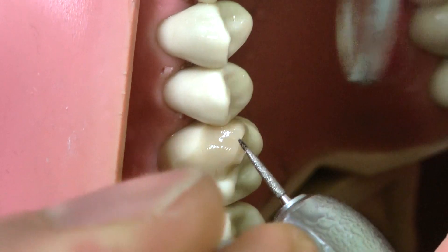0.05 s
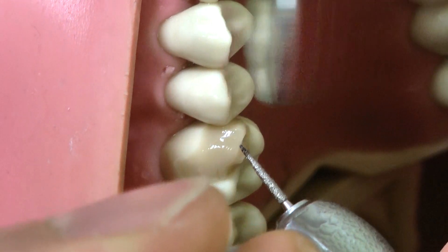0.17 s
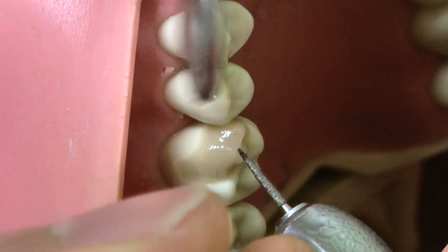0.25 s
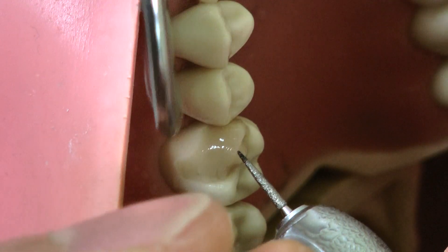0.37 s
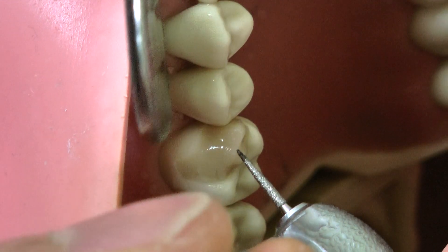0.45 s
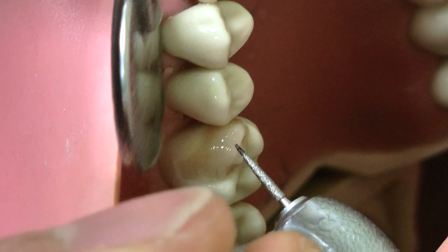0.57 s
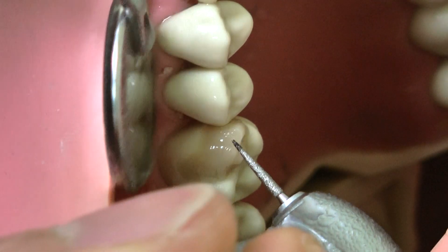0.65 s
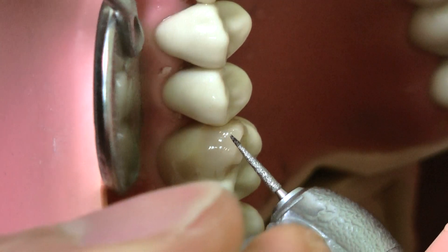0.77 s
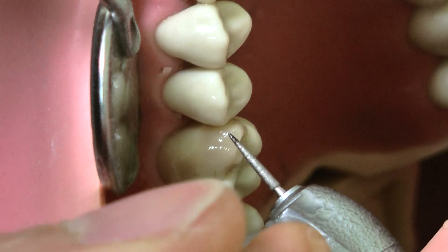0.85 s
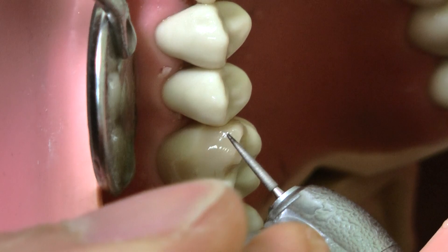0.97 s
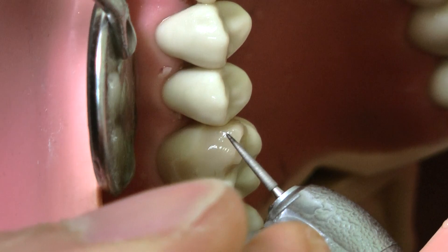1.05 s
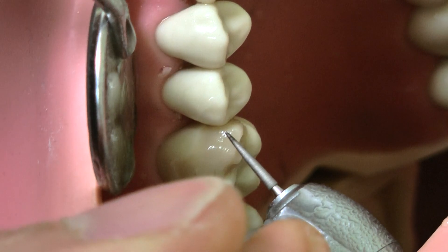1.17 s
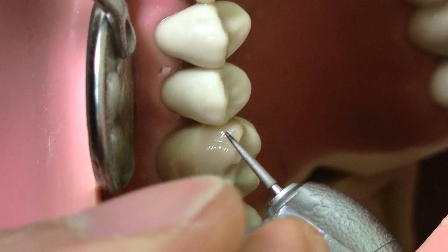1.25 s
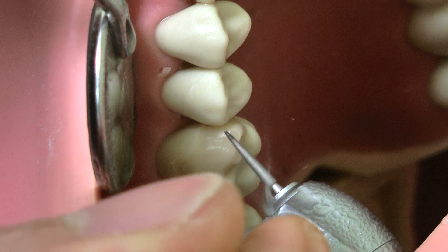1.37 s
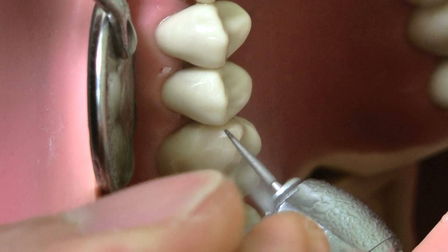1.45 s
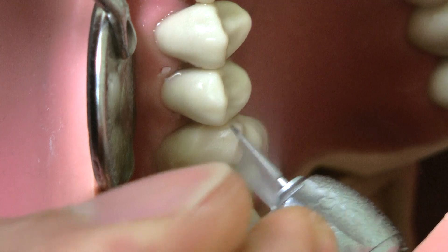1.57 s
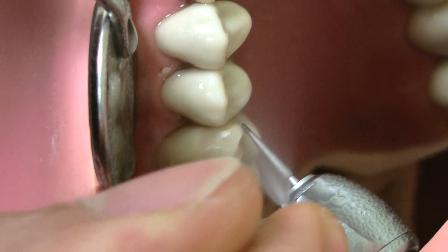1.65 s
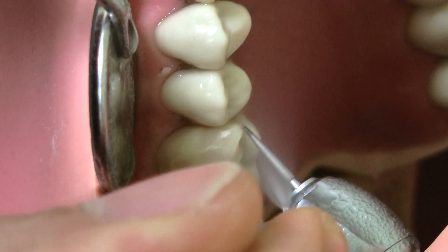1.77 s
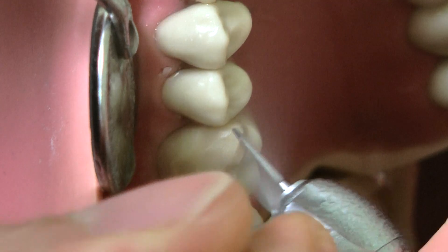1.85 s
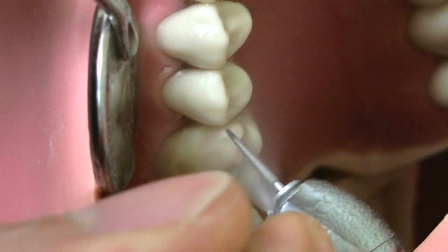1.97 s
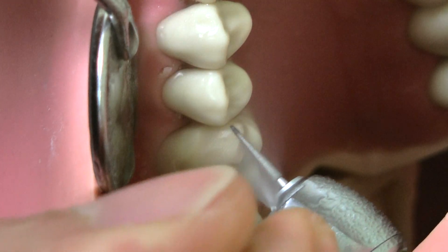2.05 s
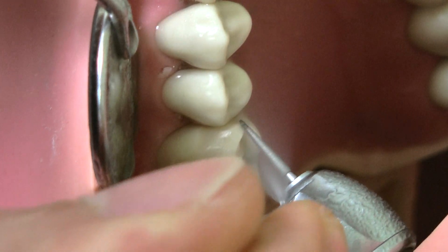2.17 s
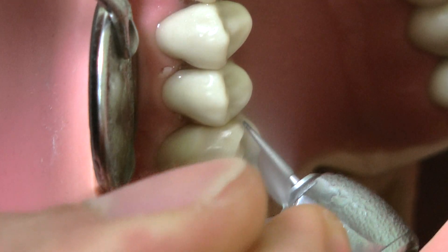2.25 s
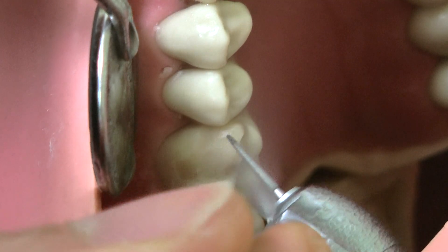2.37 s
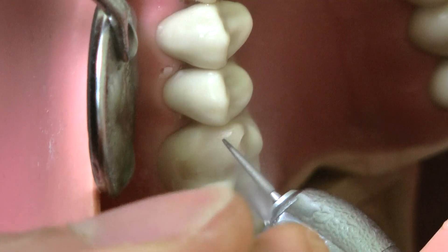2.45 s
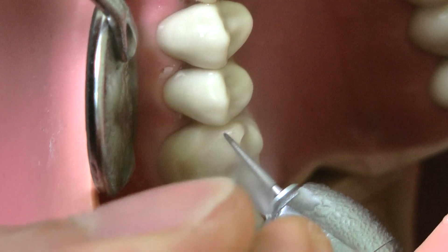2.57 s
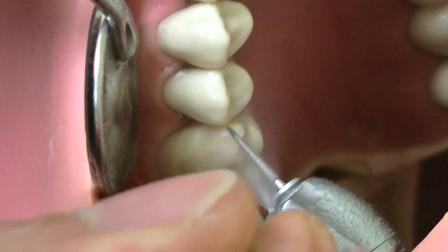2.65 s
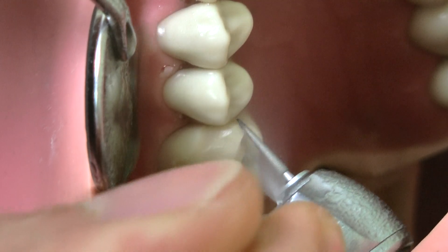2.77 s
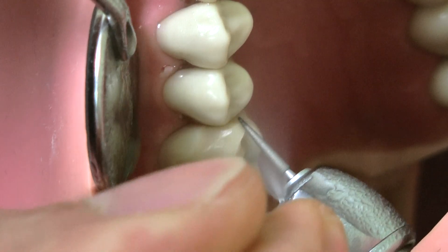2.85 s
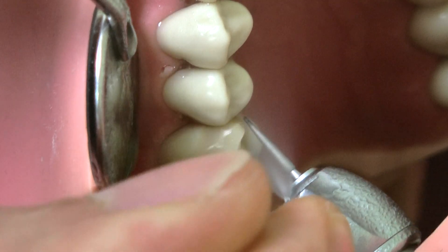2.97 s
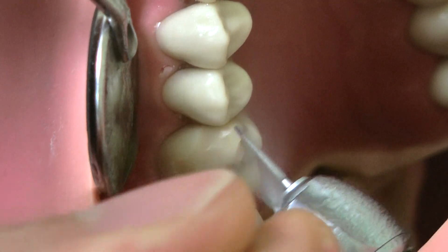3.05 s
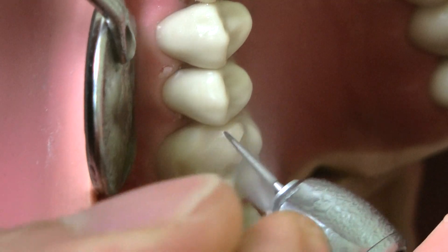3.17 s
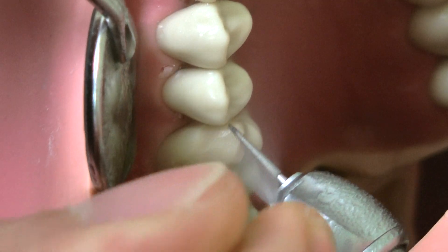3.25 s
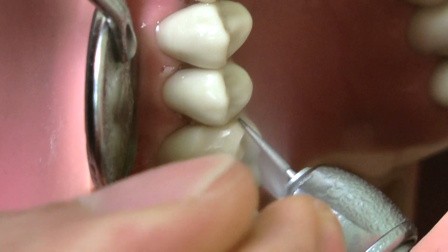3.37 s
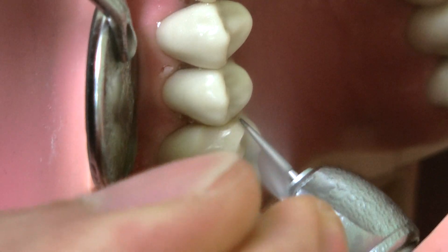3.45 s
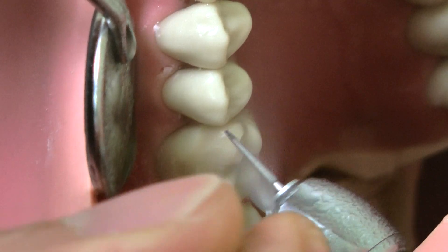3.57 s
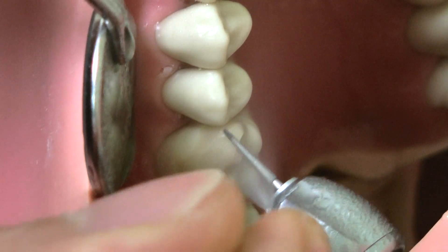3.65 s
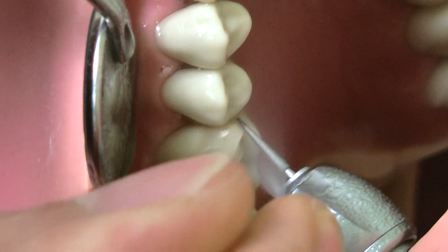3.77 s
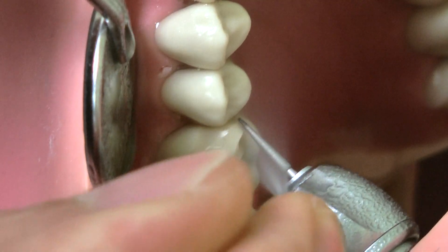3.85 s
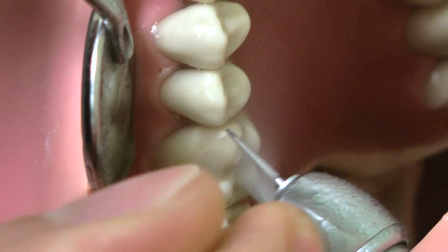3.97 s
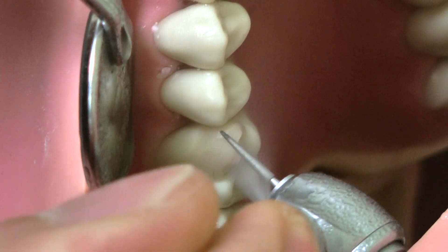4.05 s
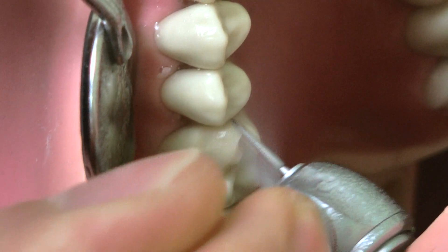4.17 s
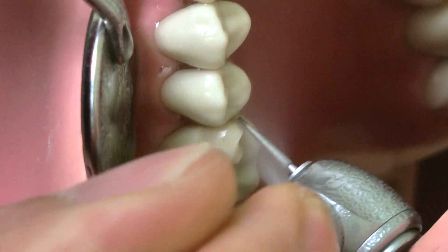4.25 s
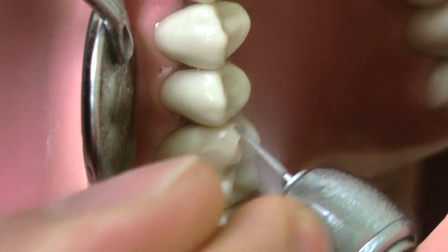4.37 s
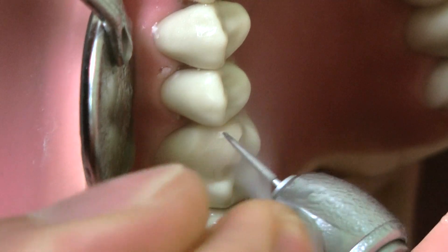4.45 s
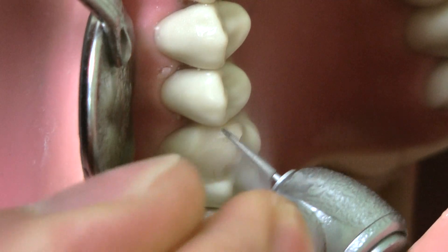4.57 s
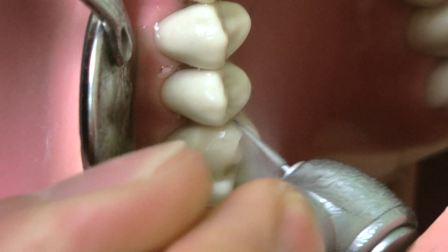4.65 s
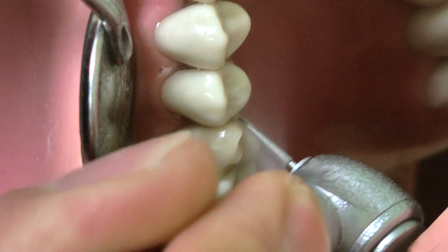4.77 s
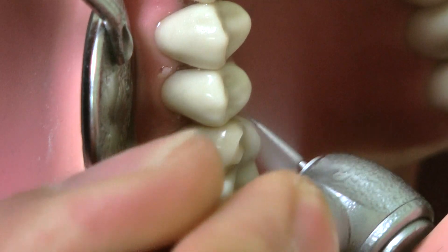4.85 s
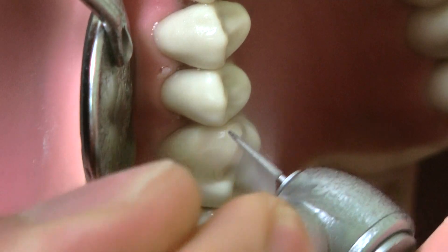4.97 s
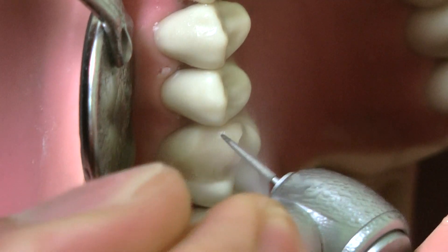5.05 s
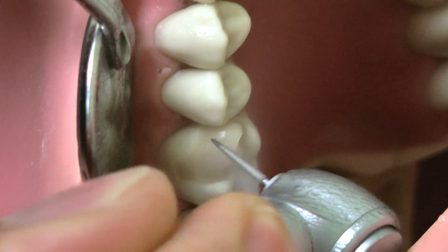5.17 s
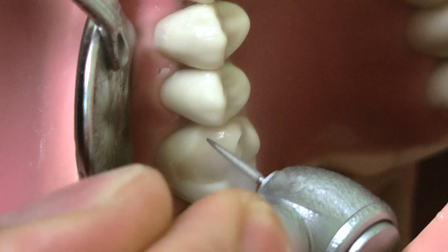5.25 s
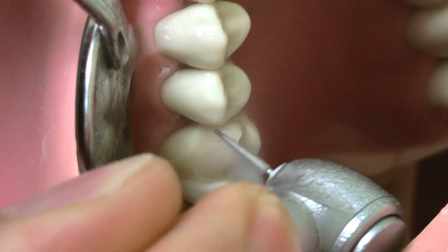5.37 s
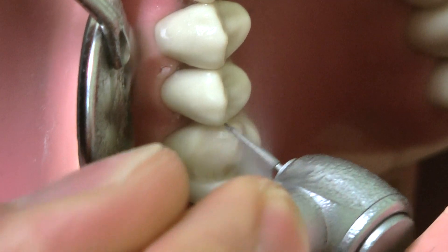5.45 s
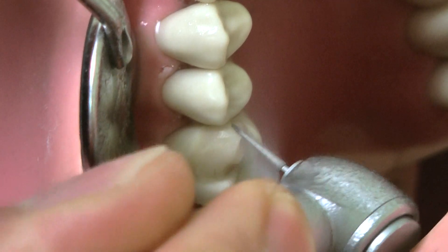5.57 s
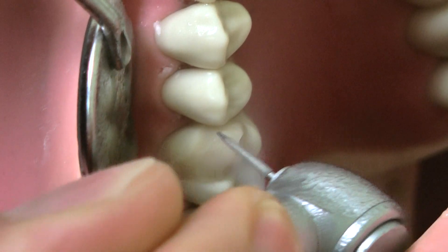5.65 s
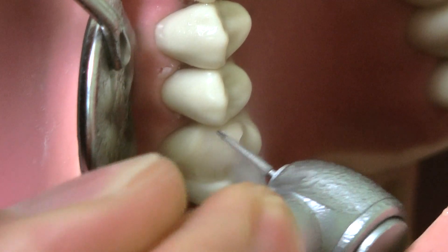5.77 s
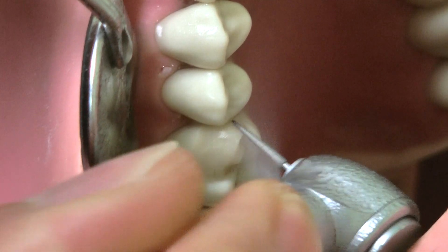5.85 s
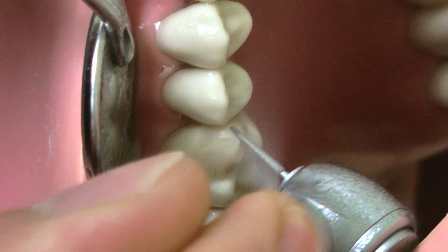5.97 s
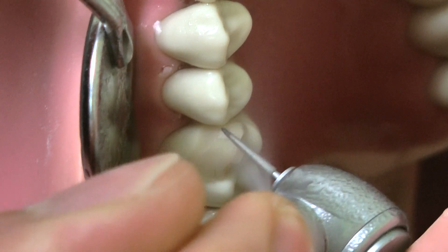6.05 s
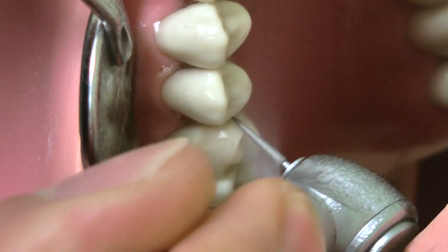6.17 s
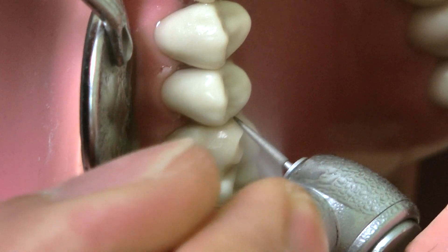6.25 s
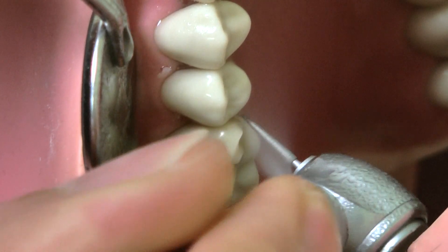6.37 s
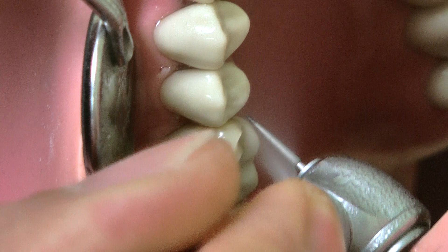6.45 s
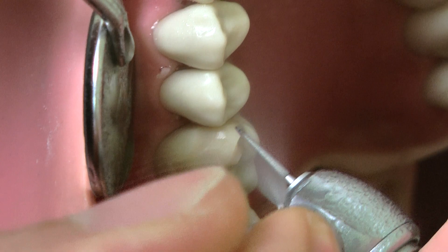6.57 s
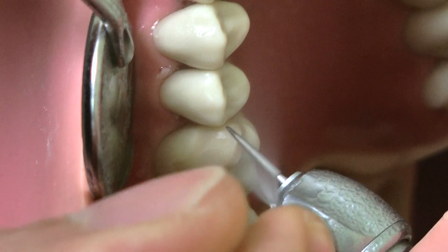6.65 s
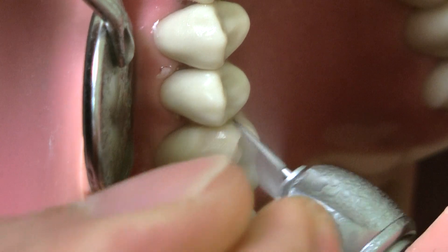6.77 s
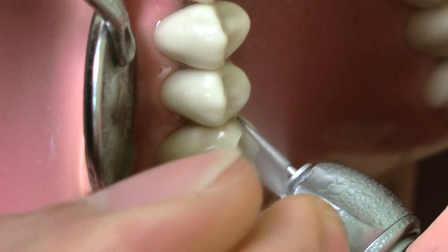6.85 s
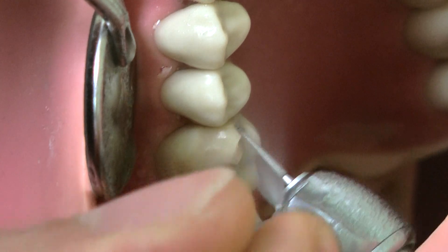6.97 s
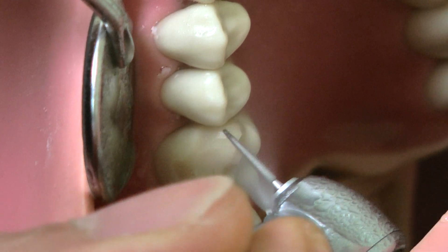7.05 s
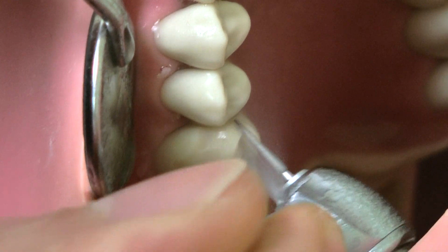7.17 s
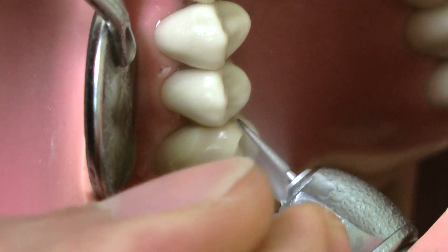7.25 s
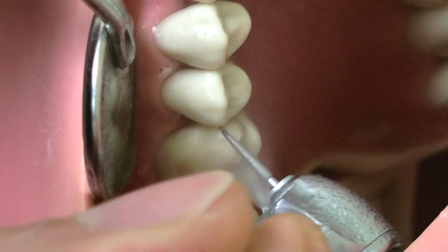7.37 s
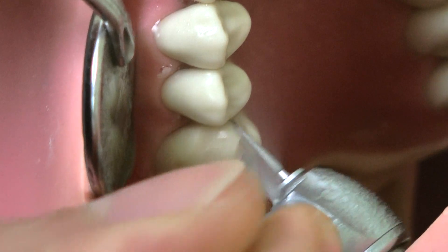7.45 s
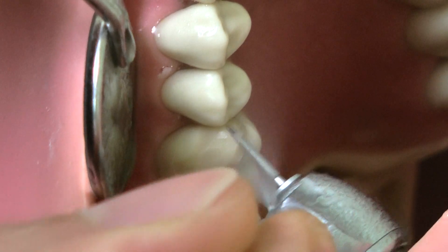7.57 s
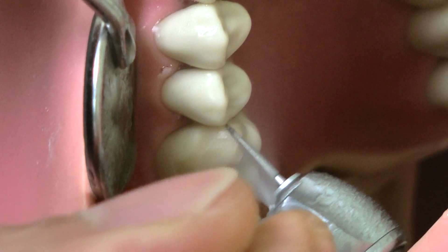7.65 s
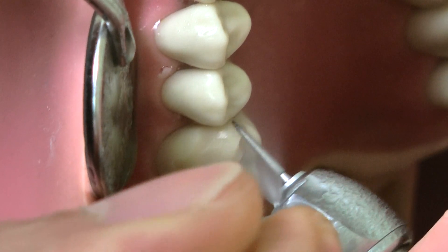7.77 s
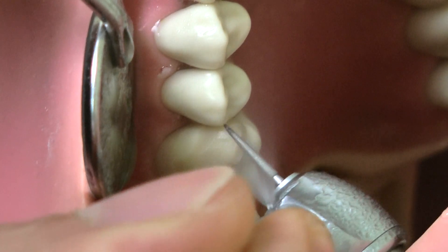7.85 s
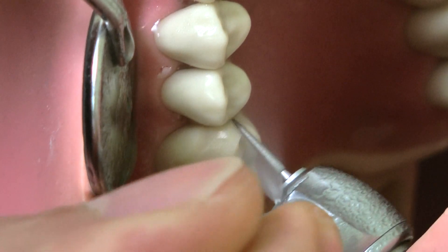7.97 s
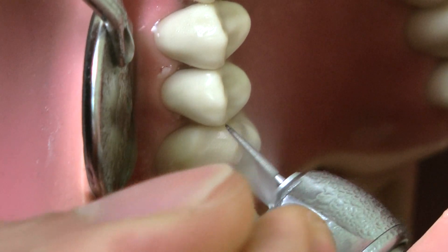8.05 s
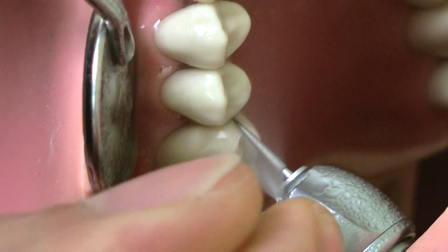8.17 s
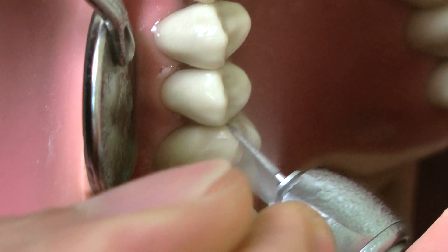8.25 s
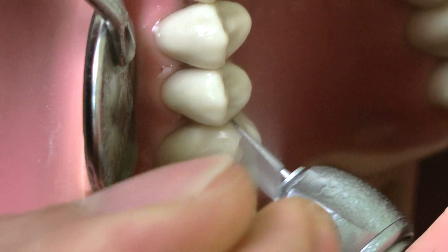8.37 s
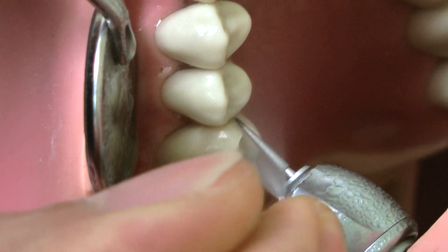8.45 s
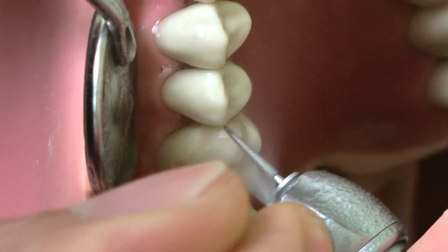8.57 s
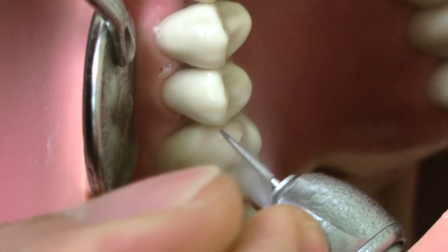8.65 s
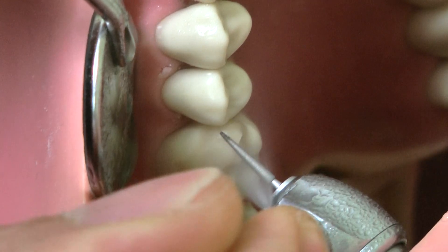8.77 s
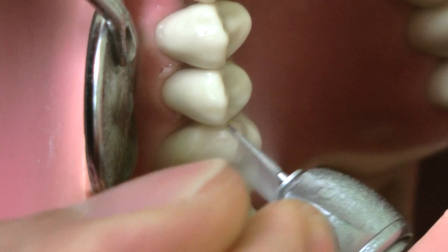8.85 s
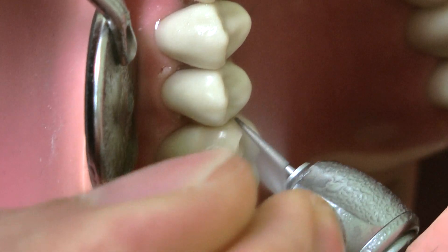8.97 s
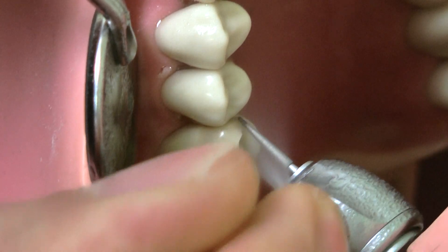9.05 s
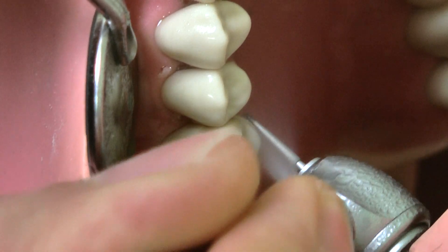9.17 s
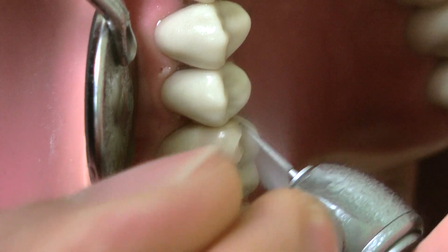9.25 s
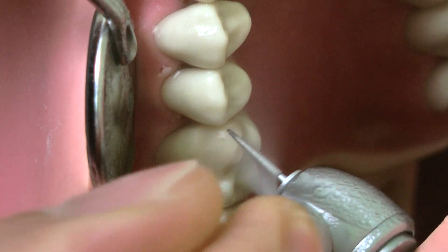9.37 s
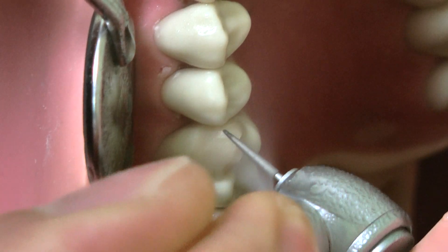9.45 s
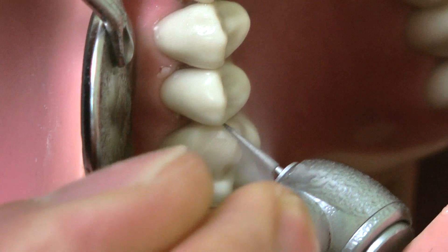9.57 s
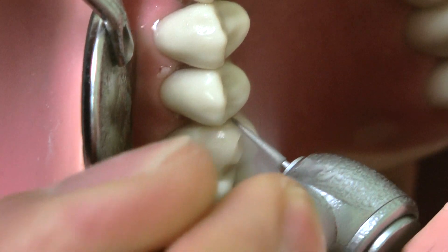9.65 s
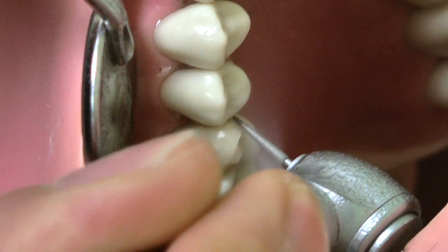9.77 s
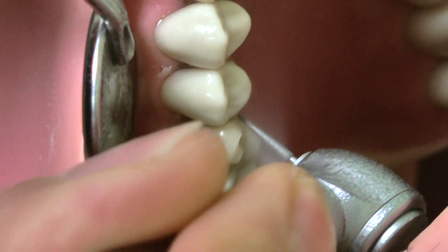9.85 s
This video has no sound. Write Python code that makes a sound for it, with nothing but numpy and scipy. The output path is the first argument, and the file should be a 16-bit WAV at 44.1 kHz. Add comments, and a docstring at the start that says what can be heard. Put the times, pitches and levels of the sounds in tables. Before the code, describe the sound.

Close up in a quiet room with faint rumble and hum, instruments tap a hollow practice head. A small rub, chirp and airy puff follow, then air and water hiss. A dental turbine sweeps rapidly upward and settles into a piercing whine. Short strokes on a plastic tooth pull it slightly lower, muffling and fluttering it while the wet grinding hiss swells.

```python
"""An air-turbine dental handpiece shapes a plastic tooth in a practice head, close by, over rumble, hum and a fan whine.
Instruments tap the head; brief low rubs, a chirp and breathy puffs follow; then drive air and water start to hiss.
The rotor's eight blades chop the air into an upward sweep, and the shaft settles into a whine, one cycle per turn.
Each time the bur bites, drag lowers the whine, which dulls and flutters, and the wet grinding hiss swells."""
import sys
import numpy as np
from scipy import signal
from scipy.fft import rfft, irfft, next_fast_len
from scipy.io import wavfile
from scipy.ndimage import uniform_filter1d, map_coordinates

SR = 44100
rng = np.random.default_rng(int(sys.argv[2]) if len(sys.argv) > 2 else 0)


def generate_wav(signal):
    """Clip the signal to [-1, 1] and save it as 16-bit WAV at the path in sys.argv[1]."""
    frames = np.transpose(np.atleast_2d(signal))
    scaled = np.clip(frames, -1, 1) * 32767
    pcm = np.round(scaled).astype(np.int16)
    wavfile.write(sys.argv[1], SR, pcm)


N = 436590


def amp(db):
    """Decibels to gain."""
    return 10 ** (np.asarray(db) / 20)


def unit(x):
    """Scale to rms 1."""
    return x / np.sqrt(np.mean(np.abs(x) ** 2) + 1e-20)


def clock():
    """Time of every sample (s)."""
    return np.arange(N) / SR


def along(points, hz):
    """Interpolate (Hz, value) points on a log frequency axis."""
    point_hz, values = np.transpose(points)
    return np.interp(np.log(hz + 1), np.log(point_hz + 1), values)


def curves(rows):
    """One value per sample for each column after the time."""
    knot_s, *columns = np.transpose(rows)
    return [np.interp(clock(), knot_s, column) for column in columns]


def wobble(rate):
    """Smooth random curve, rate knots a second."""
    knots = rng.standard_normal(int(N * rate / SR) + 4)
    return map_coordinates(knots, [clock() * rate])


def scatter(rate):
    """Random phasor of rms 1: it blurs a tone to about rate Hz."""
    return unit(wobble(rate) + 1j * wobble(rate))


def filtered(x, response):
    """Multiply the spectrum of x by a response of frequency."""
    size = next_fast_len(N + SR // 2)
    spectrum = rfft(x, size) * response(np.fft.rfftfreq(size, 1 / SR))
    return irfft(spectrum, size)[..., :N]


def noise(colour, width):
    """Stereo noise of rms 1 with a dB colour; the side signal fades out around 9.5 kHz."""
    mid, side = filtered(rng.standard_normal((2, N)), lambda hz: amp(colour(hz)))
    side = width * filtered(side, lambda hz: 1 / (1 + (hz / 9500) ** 8))
    return unit(np.array([mid + side, mid - side]))


def background():
    """Ventilation rumble is coloured noise; low hums and a faint fan whine are wavering tones that fade in and out."""
    # spectrum of the room: freq_hz, density_db (dB per Hz, relative)
    room_tone = [(15, -38), (25, -1.5), (82, -1.5), (145, -6), (206, -3.5), (309, -6), (354, -6), (560, -8),
                 (800, -13.5), (1440, -19.5), (1650, -17.5), (1800, -15), (2000, -19), (4000, -26.5),
                 (16000, -41)]
    # rumble level: time_s, level_db
    rumble_level = [(1.3, -57.5), (1.6, -62.5), (4.4, -59.5), (5.6, -57), (7.6, -54), (9.9, -58.5)]
    # hums and fan whine: freq_hz, level_db (before waver), start_s, end_s
    steady_tones = [(32, -60, 7.4, 9.2), (68, -66, 0, 1.45), (65, -63, 2.4, 3.5), (66, -54, 4.68, 5.05),
                    (68, -62, 5.3, 9.9), (101, -57, 5.45, 6.15), (101, -62, 6.4, 9.9), (101, -58, 7.7, 8.3),
                    (200, -67, 0, 9.9), (1778, -71, 0, 9.9)]
    t = clock()
    out = amp(curves(rumble_level)[0]) * noise(lambda hz: along(room_tone, hz), width=0.36)
    for hz, db, start_s, end_s in steady_tones:
        swell = np.clip(np.minimum(t - start_s, end_s - t) / 0.075, 0, 1)
        waver = 1 + 0.6 * scatter(7)
        out += amp(db) * swell * np.real(waver * np.exp(2j * np.pi * hz * t))
    return out


def knocks():
    """Instruments tap the practice head: a short noise click and the head's dull, decaying modes."""
    # taps: start_s, thud_db (gain on the modes), click_db, click_t60_s
    taps = [(0.262, -64, -50.5, .12), (0.284, -43, -49.5, 0.16), (.336, -60, -55, .1),
            (.464, -55, -48.5, 0.094), (0.908, -67, -41, 0.054), (.971, -52, -40, .04)]
    # modes of the head: freq_hz, level_db (relative), t60_s
    head_modes = [(288, -6, 0.38), (416, 4, 0.058), (1230, -12, 0.13), (2536, -10, .1)]
    # spectrum of the click: freq_hz, density_db (dB per Hz, relative)
    click_colour = [(300, 2), (1300, 1), (2600, 3.5), (5500, -2), (8000, -19), (11000, -14), (15000, -37)]
    out = np.zeros((2, N))
    click = noise(lambda hz: along(click_colour, hz), width=0.2)
    for start_s, thud_db, click_db, click_t60_s in taps:
        t = np.maximum(clock() - start_s, 0)[:2 * SR]
        ring = sum(amp(db - 60 * t / t60_s) * np.sin(2 * np.pi * hz * t) for hz, db, t60_s in head_modes)
        blow = amp(thud_db) * ring + amp(click_db - 60 * t / click_t60_s) * click[:, :len(t)]
        attack = 1 - np.exp(-t / 0.0014)  # also silences the time before the tap
        out[:, :len(t)] += blow * attack
    return out


def rubs_chirp_and_puffs():
    """Brief, unsteady rubs and low squeaks, then a 2.5 kHz chirp, probably the valve, with breathy puffs."""
    # blurred tones: centre_s, length_s (two standard deviations), freq_hz, blur_hz, level_db (before blur)
    bursts = [(0.617, .035, 500, 110, -55), (0.629, .035, 265, 69.7, -55), (.7, .055, 480, 296, -51.5),
              (.783, 0.035, 2490, 179.4, -52), (.81, 0.076, 2490, 120, -60),
              (0.782, 0.072, 1300, 1200, -59), (0.78, 0.063, 4200, 1800, -63)]
    t, out = clock(), np.zeros(N)
    for centre_s, length_s, hz, blur_hz, db in bursts:
        envelope = np.exp(-(2 * (t - centre_s) / length_s) ** 2 / 2)
        unsteady = 0.34 + 1.6 * scatter(blur_hz)
        out += amp(db) * envelope * np.real(unsteady * np.exp(2j * np.pi * hz * t))
    return out


def room(x):
    """A short diffuse tail of decaying noise, different on each side."""
    # reverberation of the room: freq_hz, t60_s
    walls = [(200, .3), (2000, 0.75), (12000, 0.02)]
    hz, t, bins = signal.stft(rng.standard_normal((2, SR // 2)), SR, nperseg=256)
    decay = amp(-60 * t / along(walls, hz)[:, None])
    tail = signal.istft(bins * decay, SR, nperseg=256)[1]
    return signal.fftconvolve(x[None], tail / np.linalg.norm(tail[0]), axes=1)[:, :N]


def exhaust():
    """The valve opens before the rotor sounds, and drive air hisses out from then on."""
    # spectrum of the drive air: freq_hz, density_db (dB per Hz, relative)
    exhaust_colour = [(300, -11.5), (2400, -5), (4900, -3.5), (5700, 4.5), (6700, -5), (7500, -9),
                      (8700, -9), (9300, -4), (10200, -15), (16000, -17)]
    valve = np.clip((clock() - .77) / 0.15, 0, 1) ** 2
    return amp(-46.5) * valve * noise(lambda hz: along(exhaust_colour, hz), width=0.4)


def nearby(x, share=0.31, count=40):
    """Teeth, hands and bench return weak copies within 2-25 ms that comb the hiss."""
    echoes = np.zeros(SR // 40)
    delays = rng.integers(SR // 500, len(echoes), count)
    echoes[delays] = share * rng.standard_normal(count) / np.sqrt(count)
    return x + signal.fftconvolve(x, echoes[None], axes=1)[:, :N]


def cavity(hz):
    """The dB that resonances of the head and hollow mouth add to or take from the spray and jet."""
    # resonances: freq_hz, width_hz, lift_db
    resonances = [(544, 190, 3.5), (1100, 13, 3), (1138, 64, -6), (1235, 130, 6.5), (1870, 29, 4.5),
                  (2670, 270, 7), (3844, 97, 7.5), (3900, 65, -10), (4057, 63, 5.5), (4210, 40, 3),
                  (4660, 74, 5.5), (6830, 79, 3.5), (9400, 210, 2.5)]
    return sum(db / (1 + (2 * (hz - centre) / width) ** 2) for centre, width, db in resonances)


def hiss(grind_db, jet_db, bite):
    """Spray and chips spatter in the mouth; the air jet adds a smoother, brighter hiss."""
    # spectra before the cavity: freq_hz, density_db (dB per Hz, relative)
    spray_colour = [(120, -36), (320, -17.5), (430, -8), (800, -6.5), (1550, -7.5), (2300, 0.5), (3000, 2),
                    (3550, -2.5), (5100, -0.5), (6400, -1.5), (7600, -5.5), (10300, -4.5), (12000, -11.5),
                    (16500, -22)]
    jet_colour = [(1500, -40), (4000, -2.5), (5800, 3.5), (7400, -2), (8900, -3), (9400, -1), (10600, 4.5),
                  (11600, -2), (13600, -2), (14700, 1), (15700, 1), (16400, -0.5)]
    spatter = unit(amp((0.26 + bite) * (0.37 * wobble(35) + 0.77 * wobble(600))))
    spray = noise(lambda hz: along(spray_colour, hz) + cavity(hz), width=0.23) * amp(grind_db + 2.5)
    jet = noise(lambda hz: along(jet_colour, hz) + cavity(hz), width=0.34) * amp(jet_db + 6.0)
    jet_flicker = unit(amp(0.3 * wobble(30) + 1.3 * wobble(900)))
    return spray * spatter + jet * jet_flicker


def shaft_speed(drag_hz):
    """Turns a second: after the spin-up the rotor lags toward its free speed less the drag."""
    # the rotor gathers speed: time_s, shaft_hz
    spin_up = [(1.0, 25), (1.05, 64), (1.1, 130), (1.2, 331), (1.3, 790), (1.35, 1160), (1.4, 1630),
               (1.48, 2510), (1.55, 3345)]
    # free-running speed, easing as the air pressure settles: time_s, shaft_hz
    free_speed = [(2.6, 5672), (5.2, 5586)]
    inertia_s = .198  # time constant of the lag
    knot_s, knot_hz = np.transpose(spin_up)
    rising = np.exp(np.interp(clock()[:round(knot_s[-1] * SR)], knot_s, np.log(knot_hz)))
    pull_hz = (curves(free_speed)[0] - drag_hz)[len(rising):] - knot_hz[-1]
    step = 1 / (inertia_s * SR)
    driven = knot_hz[-1] + signal.lfilter([step], [1, step - 1], pull_hz)
    return np.concatenate([rising, driven])


def shaft_angle(speed):
    """The rotor's angle (rad): its speed, with a slight tremor, summed over time."""
    tremor = 1 + 0.00058 * wobble(70) + 0.000398 * wobble(14)
    return 2 * np.pi * np.cumsum(speed * tremor) / SR


def blades(angle, speed, count=8):
    """The blades chop the air like a siren; each harmonic stops on rising past half the sample rate."""
    # blade tone: time_s, level_db (before harmonics and breath)
    siren = [(1.0, -66), (1.05, -53), (1.145, -41.5), (1.165, -37), (1.207, -32.5), (1.235, -38.5),
             (1.288, -29), (1.32, -36.5), (1.46, -37)]
    level = amp(curves(siren)[0]) * (clock() > siren[0][0])
    blade_hz = count * speed
    edge = np.clip(blade_hz / 950, 0, 1) ** 2 / (1 + blade_hz / 3000)  # puffs sharpen, then round off
    turbulence = np.clip(blade_hz / 2200, 0, 1)
    out = np.zeros(N)
    for k, db in enumerate([0, 2.5, -11], 1):
        breathy = 1 + 0.71 * scatter(120) + 0.58 * turbulence * scatter(900)
        tone = np.real(np.exp(1j * k * count * angle) * breathy)
        out += (k * blade_hz < SR / 2) * amp(db) * edge ** (k - 1) * tone
    return np.sqrt(2) * level * out


def judder():
    """Brief pulses at an uneven rate, mean 0: the skips of the bur, to be taken off the level."""
    rate_hz = 13  # typical skips a second
    skips = np.cumsum(rate_hz * amp(3 * wobble(9))) / SR
    dips = np.sin(np.pi * skips) ** 4
    return dips - dips.mean()


def whine(angle, bite, shake):
    """One cycle per turn: purest when the bur runs free, muffled as it bites, rough and juddering as it shakes."""
    # whine with the bur in the air: time_s, level_db
    free_whine = [(1.5, -41.5), (1.64, -26), (1.7, -30), (1.85, -29), (2.0, -27), (2.37, -23), (2.6, -24),
                  (3.2, -22), (5.1, -20), (6.4, -22.5), (9.55, -20)]
    damping_db, judder_db = 11, 7.5  # muffling and dip depth at bite and shake of 1
    tremble_db, tremble_rate = .8, 55  # even a free bur trembles in the hand: depth, knots a second
    whine_db = curves(free_whine)[0] - damping_db * bite
    whine_db = whine_db - judder_db * shake * judder() + tremble_db * wobble(tremble_rate)
    level = amp(whine_db) * np.clip((clock() - free_whine[0][0]) / .02 + 1, 0, 1)
    chatter = shake * (0.84 * scatter(55) + 0.35 * scatter(330))
    # reflections reach each side differently
    paths = (0.22 + .5 * shake) * np.array([scatter(20), scatter(24)])
    bearings = .09 * scatter(250)
    flutter = (1 + chatter + paths + bearings) * amp(2.9 * shake * wobble(50))
    # hold the mean power over 0.1 s, so flutter leaves the level alone
    flutter /= np.sqrt(uniform_filter1d(np.mean(np.abs(flutter) ** 2, 0), SR // 10))
    return np.sqrt(2) * level * np.real(flutter * np.exp(1j * angle)) * amp([[-.7], [.9]])


def overtones(angle, shake, grind_db):
    """Side pressure and shaking make the shaft and bearings sing in fits."""
    # partials: multiple (of shaft rate), level_db (relative), blur (0-1)
    partials = [(1.935, -5.5, 0.76), (2, -3, 0), (3, -10, .4)]
    out = np.zeros(N)
    for multiple, db, blur in partials:
        fits = unit(amp(3.4 * wobble(28)) * (1 - blur + blur * scatter(140)))
        out += amp(db) * np.real(fits * np.exp(1j * multiple * angle))
    fade_in = np.clip((clock() - 1.6) / 0.057, 0, 1)
    return np.sqrt(2) * out * amp(grind_db - 8 + 5.7 * shake) * fade_in


def bur_contact():
    """Each stroke presses, brushes on and lifts: the drag on the rotor (Hz) and the bite (0-1)."""
    # strokes: start_s, pressed_s, then brushing_s, drag_hz (full press), bite (0-1, full press)
    cuts = [(2.125, 0.092, 0.029, 270, 0.48), (2.69, 0.24, 0.16, 350, 0.41), (3.319, 0.13, 0.14, 360, 0.64),
            (3.757, 0.12, 0.12, 420, 0.64), (4.204, 0.074, 0.14, 430, 0.8), (4.676, 0.18, 0.08, 230, 0.83),
            (5.499, 0.099, 0.097, 290, 0.59), (5.87, 0.11, 0.11, 145, 0.46), (6.197, 0.073, 0.0, 550, 0.6),
            (6.281, 0.15, 0.37, 190, 0.16), (6.736, 0.04, 0.067, 180, 0.35),
            (6.811, 0.068, 0.018, 820, 0.52), (6.95, 0.11, 0.11, 19, 0.42), (7.197, 0.087, 0.047, 450, 0.6),
            (7.341, 0.086, 0.16, 270, 0.32), (7.49, 0.162, 0.0, 220, 0.38), (7.68, 0.19, 0.0, 170, 0.81),
            (7.906, 0.157, 0.0, 220, 0.83), (8.104, 0.173, 0.0, 195, 0.76),
            (8.307, 0.094, 0.035, 250, 0.47), (8.425, 0.131, 0.0, 250, 0.65),
            (8.595, 0.082, 0.074, 290, 0.66), (8.886, 0.28, 0, 220, 0.62), (9.248, 0.14, 0.036, 3.8, 0.64),
            (9.63, 0.15, 0.096, 260, 0.53), (9.803, 0.098, 0.01, 136, 0.09)]
    press_s, brush_share = .079, 0.89  # time to press or lift; share of the bite left while brushing
    t, drag_hz, bite = clock(), np.zeros(N), np.zeros(N)

    def touch(start_s, length_s):
        """Contact 0-1, ramping about its start and end; a short touch stays partial."""
        inside_s = np.minimum(t - start_s, start_s + length_s - t)
        return np.clip(inside_s / press_s + .5, 0, 1)

    for start_s, pressed_s, brushing_s, cut_drag_hz, depth in cuts:
        press = touch(start_s, pressed_s)
        contact = touch(start_s, pressed_s + brushing_s)
        drag_hz += cut_drag_hz * press
        bite += depth * ((1 - brush_share) * press + brush_share * contact)
    return drag_hz, bite


def scene():
    """Each stroke on the tooth slows the rotor, muffles the whine and swells the grinding."""
    # water reaches the head, then runs on; bur in the air: time_s, spray_db, jet_db (both before trims)
    flow = [(.85, -100, -100), (1.05, -46.5, -57), (1.22, -45.5, -50), (1.33, -46, -39.5), (1.41, -40, -36),
            (1.46, -44, -40.5), (1.52, -35.5, -36.5), (1.7, -38, -41), (2.4, -38, -43), (5.3, -38, -43),
            (6.2, -36, -39.5), (7.3, -36, -39.5), (8.4, -36, -39), (9.55, -36, -41.5), (9.89, -36, -39.7)]
    settled_hz, runup_hz, runup_shake = 5600, 800, 0.96  # shake is greatest once runup_hz below settled_hz
    grind_rise_db, jet_rise_db = 4.5, 4.5  # lift of the hisses at a bite of 1
    drag_hz, bite = bur_contact()
    speed = shaft_speed(drag_hz)
    angle = shaft_angle(speed)
    shake = np.maximum(bite, runup_shake * np.clip((settled_hz - speed) / runup_hz, 0, 1))
    spray_db, jet_db = curves(flow)
    splash_db = 0.54 * wobble(14)  # the water strikes the tooth unevenly
    grind_db = spray_db + grind_rise_db * bite + splash_db
    jet_db = jet_db + jet_rise_db * bite + splash_db * bite
    near = blades(angle, speed) + rubs_chirp_and_puffs() + overtones(angle, shake, grind_db)
    air = amp(-0.67) * nearby(hiss(grind_db, jet_db, bite) + exhaust())
    handpiece = whine(angle, bite, shake) + near + amp(-15) * room(near) + air
    return handpiece * amp([[-.2], [.2]]) + knocks() + background()


def record(dry):
    """A steep low-pass leaves almost nothing above the band limit."""
    top_hz = 16520
    return filtered(dry, lambda hz: 1 / (1 + (hz / top_hz) ** 300))


dry = scene()
out = record(dry)
generate_wav(out)
```